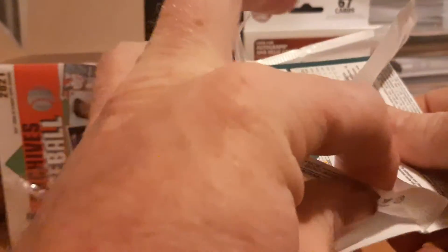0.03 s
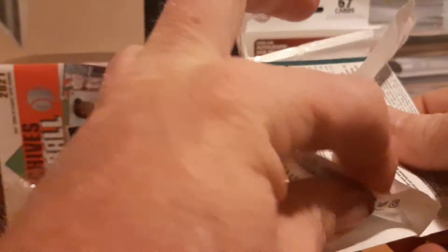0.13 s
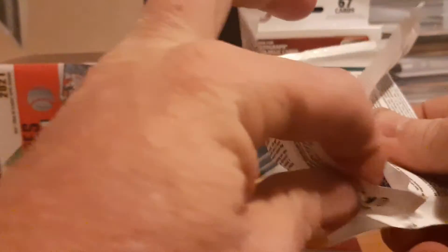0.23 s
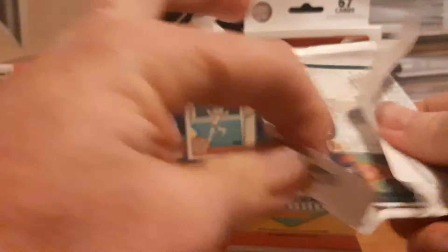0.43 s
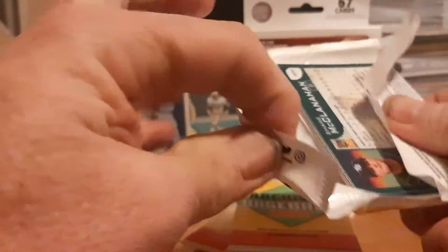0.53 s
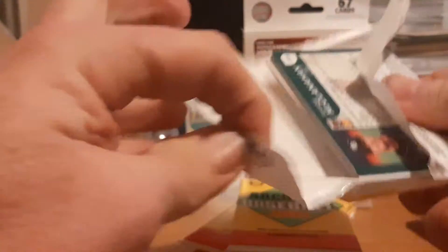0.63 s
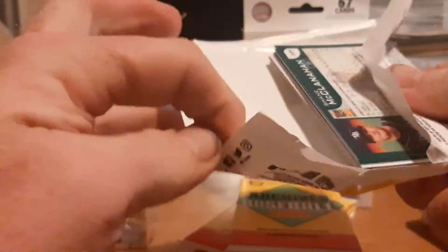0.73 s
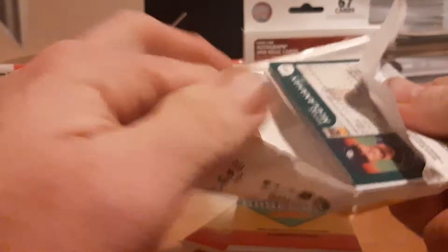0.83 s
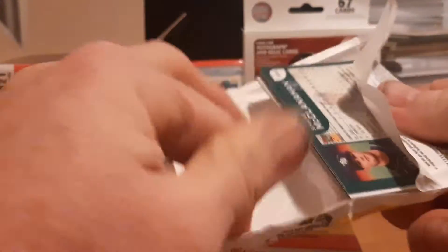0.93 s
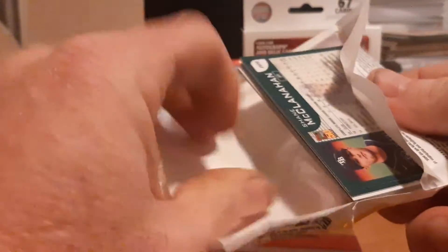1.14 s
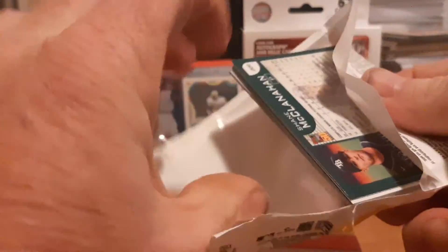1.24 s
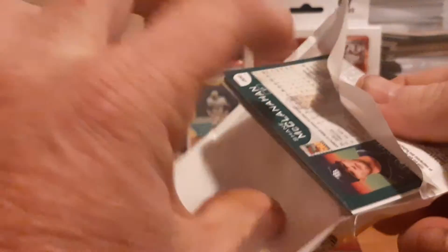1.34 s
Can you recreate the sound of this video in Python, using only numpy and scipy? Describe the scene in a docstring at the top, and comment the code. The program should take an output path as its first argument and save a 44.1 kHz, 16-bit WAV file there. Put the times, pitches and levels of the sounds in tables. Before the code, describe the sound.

Stiff plastic card-pack wrapper tears open in sharp crackling bursts, then rustles softly, close up indoors

```python
"""Stiff plastic film snaps as hands tear open the wrapper of a card pack, close up in a small room.
Each snap is a click and a burst of noise that rings one facet, flaps the sheet and fizzes at a crease.
Two pulls rip the seam in dense runs of tiny cracks, made of decaying noise grains.
Then the loose wrapper slides over the cards in a soft hiss of finer grains, with scattered snaps.
Dull sine thumps bump the cards; filtered-noise echoes and a faint room tone surround it all."""
import sys
import numpy as np
from scipy import signal
from scipy.fft import rfft, irfft
from scipy.io import wavfile

SR = 44100
rng = np.random.default_rng(int(sys.argv[2]) if len(sys.argv) > 2 else 0)


def dump_mix(stems):
    """Bounce the given channels to the path in sys.argv[1] as a 16-bit WAV at rate SR."""
    frames = np.atleast_2d(stems).T  # one column per channel
    limited = np.clip(frames, -1, 1)  # hard clip at full scale
    pcm = np.round(limited * 32767).astype(np.int16)
    wavfile.write(sys.argv[1], SR, pcm)


N = 61739

# Buckles of the film: (time [s], facet ring [dB], facet pitch [Hz], flap of the whole sheet [dB])
FILM_SNAPS = [(0.069, -59, 3700, -69), (0.0862, -54, 5700, -76), (0.1049, -47, 3400, -67),
              (0.1324, -49, 5700, -75), (0.1445, -50, 5800, -66), (0.194, -46, 3000, -51),
              (0.2084, -20, 5700, -36), (0.214, -19.5, 3400, -39), (0.2262, -28, 3500, -51),
              (0.2329, -17, 3450, -42), (0.2518, -24, 5600, -38), (0.3543, -35, 2900, -43),
              (0.3845, -42, 5800, -66), (0.3959, -32, 5200, -50), (0.4116, -29, 3600, -37),
              (0.432, -22, 3400, -35), (0.444, -27, 3100, -33), (0.4615, -25, 5200, -31),
              (0.4732, -22, 3500, -29), (0.4915, -16.5, 4200, -25), (0.5069, -24, 4900, -35),
              (0.511, -30, 5500, -30), (0.5235, -25, 5000, -23), (0.5266, -20.5, 5500, -30),
              (0.5319, -35, 3700, -28), (0.5488, -28, 3400, -36), (0.5927, -35, 2800, -37),
              (0.6689, -37, 5500, -47), (0.6894, -46, 3200, -46), (0.7687, -33, 2700, -53),
              (0.799, -42.5, 2600, -57), (0.9227, -39.5, 2850, -60), (0.9378, -45, 4000, -59),
              (0.9991, -49, 3000, -56), (1.0483, -48, 3500, -67), (1.0669, -39, 3050, -52),
              (1.1032, -41, 3700, -43), (1.1469, -40, 3800, -43), (1.1992, -54, 2100, -51),
              (1.2549, -36.5, 5200, -48), (1.2635, -32.5, 5200, -39), (1.3464, -49, 4000, -75),
              (1.3546, -45, 3100, -70), (1.3973, -37, 3000, -55)]
# The two pulls along the seam: (time [s], crackle level [dB], sheet flap level [dB])
FIRST_SEAM_PULL = [(.15, -64, -82), (.2, -46.5, -62), (.258, -30, -42), (.29, -43.5, -72),
                   (.322, -36.5, -63), (.34, -77, -58)]
SECOND_SEAM_PULL = [(.385, -46, -51), (.405, -31.5, -54), (.482, -24.5, -30), (.498, -29, -34),
                    (.53, -32.5, -38.5), (.565, -58, -44), (.64, -49, -68)]
# Film sliding on cards and fingers: (time [s], rustle level [dB], treble level [dB])
FILM_SLIDE = [(0, -65, -72.5), (.125, -73.5, -101), (.15, -54, -72), (.31, -56, -48), (.36, -59.5, -63),
              (.45, -37, -52), (.65, -57, -68.5), (.7, -48, -50), (.89, -68, -66.5), (.98, -59, -59.5),
              (1.03, -62, -68), (1.07, -45, -55.5), (1.11, -60, -63), (1.27, -48.5, -55), (1.33, -71, -79),
              (1.4, -60.5, -65)]
# Fingers bumping the cards: (time [s], peak of the envelope [dB], pitch [Hz])
CARD_KNOCKS = [(1.05, -61, 171), (1.146, -49, 670), (1.199, -47, 634), (1.395, -49.5, 198)]
# Colour of the plain film: (frequency [Hz], relative density [dB per Hz])
FILM_COLOUR = [(30, -27), (130, -14), (350, -1.5), (440, -13.5), (700, -4.5), (2900, -2), (5700, 1),
               (7400, -3), (8600, -7), (11500, 2.5), (15800, 1)]
# Resonances of the half-open pack: (centre [Hz], gain [dB] whose excess over 1 is added to the base)
PACK_RESONANCES = [(610, 5.5), (970, 8), (1540, 11)]
# Likeness of left and right: (frequency [Hz], likeness [0-1])
STEREO_LIKENESS = [(60, 0.4), (600, 0.97), (4000, 0.15), (14000, 0)]
# Decay of the room: (frequency [Hz], time to fall by 60 dB [s])
ROOM_DECAY = [(150, 0.46), (4000, 0.22), (14000, 0.077)]
# Colour of the room tone: (frequency [Hz], relative density [dB per Hz])
ROOM_TONE_COLOUR = [(25, -22), (80, -10), (390, -9.5), (600, -19.5), (6500, -25.5), (8700, -24)]

TIME = np.arange(N) / SR
PAD = 2 ** 17  # FFT length for whole-scene layers [samples]

# Film: edges of its three bands, and the width and base gain of the pack resonances
FLAP_TOP_HZ, FIZZ_FROM_HZ, SNAP_LOW_HZ = 1753, 7960, 463
PACK_WIDTH_HZ, PACK_BASE_GAIN = 95, 1.5

# Snaps: smaller, higher facets fizz more at the crease
FIZZ_DB, FIZZ_DB_PER_OCTAVE, USUAL_FACET_HZ = -6.5, 6, 4570
SNAP_SIZE = 1024  # samples
SNAP_WINDOW_S = .004  # snap levels are rms over this span
SNAP_RISE_S, SNAP_S, SNAP_TAIL_S, SNAP_TAIL_DB = .00014, .0006, .0018, -15
FLAP_S = .0015
# A facet has two modes: the weaker partner lies above a low pitch and below a high one
FACET_Q, MODE_RATIO, PARTNER_DB = 4.5, 1.7, -4.5

# Tear and slide: the spreads scale a random size between 0 and 3
FRACTURES_PER_S, FRACTURE_SPREAD_DB, FRACTURE_GRAIN_S, TEAR_FIZZ_DB = 1100, 3.5, .00046, -4
SLIPS_PER_S, SLIP_SPREAD_DB, SLIP_GRAIN_S, SLIDE_FLAP_DB = 2200, 4.5, .00013, -13
WAVER_DB, WAVER_S = 3, .012  # largest swing either way, and time between its points
KNOCK_S = .0018  # time to the peak of a knock's envelope

# Stereo: delay of the left side at time 0 and its drift, and the flap's gain on the left
LAG_S, LAG_DRIFT_S_PER_S = .00003, -.00008
FLAP_LEFT_DB = -1.43

# Room: levels of tail and quick echoes, fade of the echoes, level of the room tone
ROOM_DB, NEAR_DB, NEAR_S = -16, -11.5, .0044
TONE_DB = -73.5
EDGE_HZ = 16000  # top of the recorder's band


def amp(db):
    """Turns decibels into gain."""
    return 10 ** (np.asarray(db) / 20)


def evened(x):
    """Scales a sound to rms 1."""
    return x / np.sqrt(np.mean(x ** 2) + 1e-20)


def read(points, hz):
    """Reads a table on a log-frequency axis."""
    f, value = np.transpose(points)
    return np.interp(np.log(hz + 1), np.log(f + 1), value)


def levels(rows):
    """Draws gain curves from rows of a time and levels, at -120 dB outside them."""
    s, *columns = np.transpose(rows)
    return [amp(np.interp(TIME, s, db, left=-120, right=-120)) for db in columns]


def colour(x, gain):
    """Filters causally (minimum phase) with the given gain at each frequency."""
    size = 2 * (len(gain) - 1)
    log_gain = np.log(np.maximum(gain, gain.max() * 1e-4))
    mirrored = np.r_[log_gain, log_gain[-2:0:-1]]
    response = np.exp(np.conj(signal.hilbert(mirrored)))[:len(gain)]
    return irfft(rfft(x, size) * response)[..., :x.shape[-1]]


def ports(x, lag_s, size):
    """Turns two unrelated signals into a partly alike pair, the left one late by lag_s."""
    hz = np.fft.rfftfreq(size, 1 / SR)
    a, b = rfft(x, size)
    same = np.clip(read(STEREO_LIKENESS, hz), 0, 1)
    mid, side = a * np.sqrt(1 + same), b * np.sqrt(1 - same)
    left = (mid + side) * np.exp(-2j * np.pi * hz * lag_s)
    right = mid - side
    return irfft(np.array([left, right]))[:, :x.shape[-1]]


def lean(db):
    """Gives left the gain db and right its opposite."""
    return amp([[db], [-db]])


def add(mix, s, sound):
    """Adds a sound at time s."""
    part = mix[:, max(round(s * SR), 0):][:, :sound.shape[1]]
    part += sound[:, :part.shape[1]]


def room_tone():
    """Faint steady air of the room: coloured noise, partly alike on both sides."""
    air = ports(rng.standard_normal((2, N)), 0, PAD)
    gain = amp(read(ROOM_TONE_COLOUR, np.fft.rfftfreq(PAD, 1 / SR)))
    return amp(TONE_DB) * evened(colour(air, gain))


def room(x):
    """Quick sparse echoes from the table and boxes, and a short diffuse tail whose bands fade apart."""
    t = np.arange(SR // 2) / SR
    noise, taps = rng.standard_normal((2, 2, len(t)))
    sparse = rng.random(taps.shape) < .04
    near = taps * sparse * (t > .0015) * np.exp(-t / NEAR_S)
    hz, s, z = signal.stft(noise * (t > .006), SR, nperseg=256)
    decay = amp(-60 * s / read(ROOM_DECAY, hz)[:, None])
    tail = signal.istft(z * decay, SR, nperseg=256)[1][:, :len(t)]
    echoes = amp(NEAR_DB) * evened(near) + amp(ROOM_DB) * evened(tail)
    echoes = echoes / np.sqrt(len(t))
    return signal.fftconvolve(x, echoes, axes=1)[:, :N]


def knocks():
    """A finger bumps the stack of cards: a dull, quickly fading sine, alike on both sides."""
    out = np.zeros((2, N))
    for s, db, hz in CARD_KNOCKS:
        envelope = TIME / KNOCK_S * np.exp(1 - TIME / KNOCK_S)
        thump = np.sin(2 * np.pi * hz * TIME) * envelope
        add(out, s, amp(db) * thump[None])
    return out


def bump(hz, centre_hz, width_hz, db):
    """Height of one resonance at each frequency."""
    return (amp(db) - 1) / (1 + (2 * (hz - centre_hz) / width_hz) ** 2)


def film_bands(size):
    """Splits the film's colour into the sheet's flap, the facets' ring and the creases' fizz."""
    hz = np.fft.rfftfreq(size, 1 / SR)
    pack = PACK_BASE_GAIN + sum(bump(hz, f, PACK_WIDTH_HZ, db) for f, db in PACK_RESONANCES)
    film = amp(read(FILM_COLOUR, hz)) * pack
    low = 1 / (1 + (hz / FLAP_TOP_HZ) ** 8)
    high = 1 - 1 / (1 + (hz / FIZZ_FROM_HZ) ** 24)
    return film * np.sqrt(low), film * np.sqrt((1 - low) * (1 - high)), film * np.sqrt(high)


def crackle(per_s, spread_db, grain_s):
    """Tiny cracks of uneven size; each band gets its own, so the colour keeps changing."""
    lag = LAG_S + LAG_DRIFT_S_PER_S * TIME.mean()

    def cracks(band):
        """Noise that bursts at random moments and dies away, in one band of the film."""
        sizes = amp(spread_db * np.minimum(rng.exponential(1, N), 3))
        sizes = sizes * (rng.random(N) < per_s / SR)
        power = signal.lfilter([1], [1, -np.exp(-2 / (grain_s * SR))], sizes ** 2)
        noise = ports(rng.standard_normal((2, N)), lag, PAD)
        return colour(np.sqrt(power) * noise, band)

    flap, ring, fizz = film_bands(PAD)
    low = 1 / (1 + (np.fft.rfftfreq(PAD, 1 / SR) / USUAL_FACET_HZ) ** 10)
    flaps = cracks(flap)
    rings = cracks(ring * np.sqrt(low)) + cracks(ring * np.sqrt(1 - low))
    return evened(flaps), evened(rings), evened(cracks(fizz))


def slide():
    """Fine slips of film over card make a soft, grainy hiss that wavers with the grip."""
    flap, ring, fizz = crackle(SLIPS_PER_S, SLIP_SPREAD_DB, SLIP_GRAIN_S)
    rustle, treble = levels(FILM_SLIDE)
    waver = np.interp(TIME / WAVER_S, np.arange(N), rng.uniform(-1, 1, N))
    grip = amp(WAVER_DB * waver)
    return grip * (rustle * (ring + amp(SLIDE_FLAP_DB) * flap) + treble * fizz)


def tear():
    """The seam gives way in a run of fractures that shake the sheet."""
    flap, ring, fizz = crackle(FRACTURES_PER_S, FRACTURE_SPREAD_DB, FRACTURE_GRAIN_S)
    crack, shake = np.add(levels(FIRST_SEAM_PULL), levels(SECOND_SEAM_PULL))
    return crack * (ring + amp(TEAR_FIZZ_DB) * fizz) + shake * lean(FLAP_LEFT_DB) * flap


def facet_mode(crack, ring, f):
    """One mode of a facet: a band-pass resonance at f, excited by the crack."""
    hz = np.fft.rfftfreq(SNAP_SIZE, 1 / SR)
    resonance = hz / np.hypot(hz, FACET_Q * (hz ** 2 / f - f))
    return evened(colour(crack, ring * resonance))


def snaps():
    """Each buckle is a click and a brief shiver: it rings one facet, flaps the sheet, fizzes at the crease."""
    out = np.zeros((2, N))
    t, hz = np.arange(SNAP_SIZE) / SR, np.fft.rfftfreq(SNAP_SIZE, 1 / SR)
    flap, ring, fizz = film_bands(SNAP_SIZE)
    flap = flap * np.sqrt(1 - 1 / (1 + (hz / SNAP_LOW_HZ) ** 10))
    # The click goes into the shared signal only, so it is common to both sides
    click = np.outer([1, 0], signal.unit_impulse(SNAP_SIZE, round(2 * SNAP_RISE_S * SR)))
    rise = 1 - np.exp(-t / SNAP_RISE_S)
    sharp = rise * (np.exp(-t / SNAP_S) + amp(SNAP_TAIL_DB) * np.exp(-t / SNAP_TAIL_S))
    soft = rise * np.exp(-t / FLAP_S)
    for s, ring_db, facet_hz, flap_db in FILM_SNAPS:
        octaves = np.log2(facet_hz / USUAL_FACET_HZ)
        fizz_db = ring_db + FIZZ_DB + FIZZ_DB_PER_OCTAVE * octaves
        lag = LAG_S + LAG_DRIFT_S_PER_S * s
        shiver = rng.standard_normal((2, SNAP_SIZE))
        crack = ports(click + shiver * sharp, lag, SNAP_SIZE)
        push = ports(click + shiver * soft, lag, SNAP_SIZE)
        partner_hz = facet_hz * MODE_RATIO if facet_hz < USUAL_FACET_HZ else facet_hz / MODE_RATIO
        main = facet_mode(crack, ring, facet_hz)
        partner = facet_mode(crack, ring, partner_hz)
        sound = amp(ring_db) * (main + amp(PARTNER_DB) * partner)
        sound += amp(flap_db) * lean(FLAP_LEFT_DB) * evened(colour(push, flap))
        sound += amp(fizz_db) * evened(colour(crack, fizz))
        add(out, s, sound * np.sqrt(SNAP_WINDOW_S * SR / SNAP_SIZE))
    return out


def scene():
    """The wrapper, its flap a little to the right, in its room."""
    wrapper = snaps() + tear() + slide() + knocks()
    return wrapper + room(wrapper) + room_tone()


def record(dry):
    """The recorder's band limit: a steep low-pass."""
    low_pass = signal.firwin(255, EDGE_HZ, window=("kaiser", 9), fs=SR)
    return signal.oaconvolve(dry, low_pass[None], "same")


dry = scene()
out = record(dry)
dump_mix(out)
```